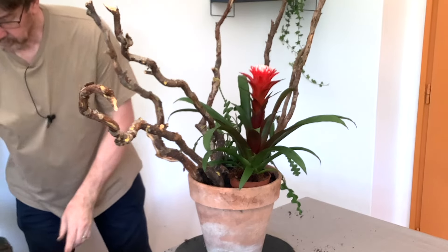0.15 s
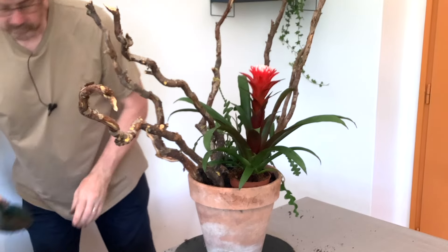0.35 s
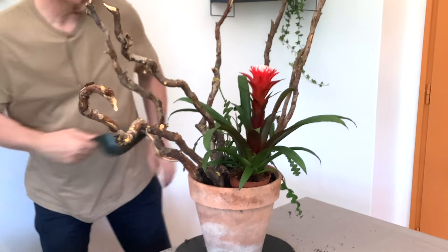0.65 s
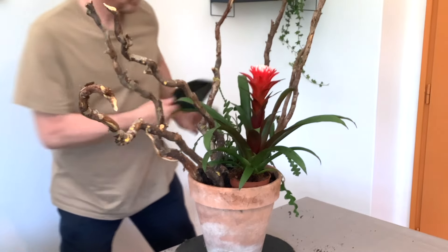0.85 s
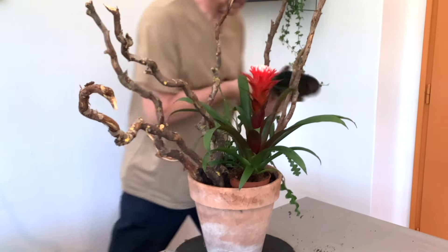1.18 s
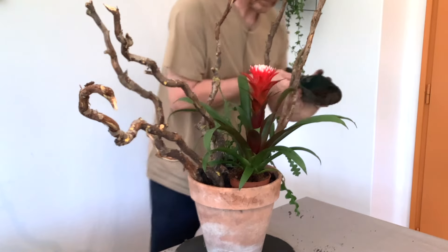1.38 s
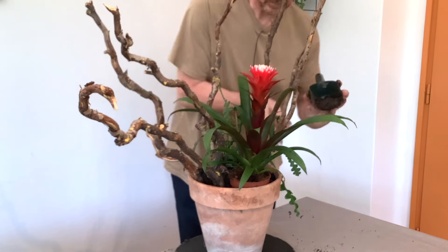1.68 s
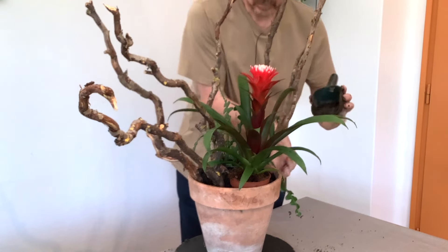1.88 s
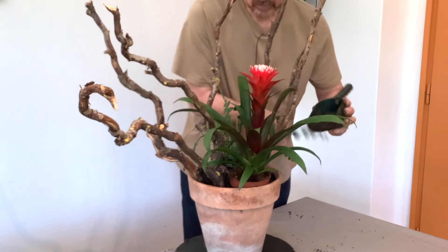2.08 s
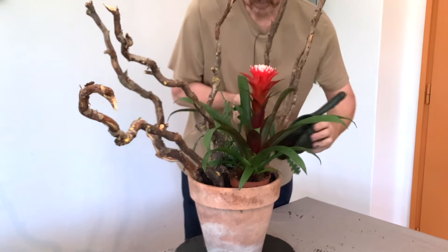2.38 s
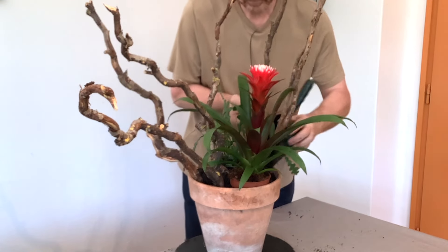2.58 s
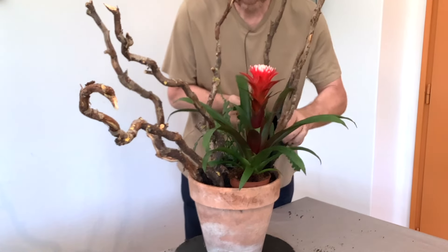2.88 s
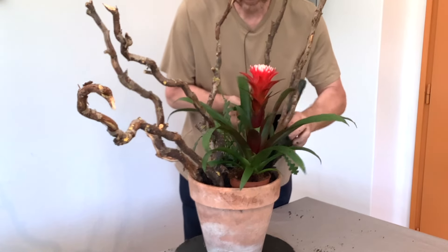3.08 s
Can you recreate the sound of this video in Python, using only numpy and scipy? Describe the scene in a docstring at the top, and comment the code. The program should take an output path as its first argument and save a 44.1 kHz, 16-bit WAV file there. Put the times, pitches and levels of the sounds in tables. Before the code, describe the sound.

A plastic scoop pours compost into a terracotta pot in a small room. It starts with a faint, hollow ring. From about 0.8 to 2 seconds, a shirt rubs and bumps a clip-on microphone while leaves swish and twigs tick over a low rumble. At 2.5 seconds a light tap starts the compost sliding. The scoop knocks at 2.6 and, louder, at 2.8 seconds, and crumbs trickle away.

```python
"""In a small room, a plastic hand scoop leaves the compost with a low, hollow ring.
As it is carried, scoop, sleeve and leaves swish, and the gardener's shirt rubs and bumps a clip-on
microphone over the rumble of its swaying lead. Twigs and leaves tick as he leans in.
With a light tap of the scoop, compost starts to slide into a terracotta pot.
The scoop then knocks twice on the pot and crumbs trickle out."""
import sys
import numpy as np
from scipy import signal
from scipy.fft import rfft, irfft
from scipy.io import wavfile
from scipy.ndimage import uniform_filter1d

SR = 44100
rng = np.random.default_rng(int(sys.argv[2]) if len(sys.argv) > 2 else 0)


def waveform_to_disk(signal):
    """Save audio, clipped to [-1, 1], as 16-bit WAV at the path in sys.argv[1]."""
    frames = np.transpose(np.atleast_2d(signal))
    scaled = np.clip(frames, -1, 1) * 32767
    samples = np.round(scaled).astype(np.int16)
    wavfile.write(sys.argv[1], SR, samples)


N = 143325
T = np.arange(N) / SR
SNAP_DECAY_S = 0.0018  # dry bits, twigs and leaves

# Scoop hits on the pot, with rattles: (time [s], thud level [dB], thud pitch [Hz], clack level [dB])
SCOOP_HITS = [(2.6154, -31.5, 333, -33.5), (2.624, -32, 1260, -38), (2.633, -52, 1190, -44),
              (2.7954, -24, 657, -31.5), (2.8042, -32.5, 1070, -25.5), (2.8181, -56, 750, -33),
              (2.8579, -36, 406, -58)]
# Modes of pot, table and scoop: (pitch [Hz], gain [dB], 60 dB decay time [s])
KNOCK_MODES = [(83.1, -1.5, 0.233), (325, -6, 0.042), (426, -6.5, 0.044), (641, -14, 0.14),
               (781, -11, 0.11), (864, -21, 0.024), (1003.6, -4, 0.11), (1097, -0.5, 0.03),
               (1344, -7, 0.028), (1552, -10, 0.068), (2560, -14, 0.066), (3600, -11, 0.046),
               (4770, -8, 0.047), (5590, -11.5, 0.048)]
# EQ of the jolted grit: (frequency [Hz], relative gain [dB])
GRIT_EQ = [(300, 11.5), (1200, 17.5), (2000, -9), (5200, -8), (7000, -2), (16000, -9.5)]


def scoop_knocks():
    """Each hit pushes the air, rings the pot's low modes and the scoop's high ones, and jolts the grit."""
    out, t = np.zeros(N), T[:SR // 2]
    clack_above_hz, detune, thump_delay_s, grit_decay_s = 2000, .015, .001, 0.0058
    clusters = {hz: noise_band(hz, 0.068 * hz) for hz, _, _ in KNOCK_MODES if hz > clack_above_hz}
    grit = equalise(rng.standard_normal(N), GRIT_EQ)
    for time, thud_db, thud_hz, clack_db in SCOOP_HITS:
        for k, (hz, db, t60) in enumerate(KNOCK_MODES):
            if hz in clusters:  # the scoop's tightly packed modes ring as noise
                ring = amp(clack_db) * np.roll(clusters[hz], -round(time * SR))[:len(t)] / np.sqrt(2)
            else:  # modes near the thud's pitch ring most
                octaves_away = np.log2(hz / thud_hz)
                drive = 0.38 + 0.62 * np.exp(-(octaves_away / 0.69) ** 2)
                detuned_hz = hz * (1 + detune * rng.uniform(-1, 1))
                ring = amp(thud_db) * drive * (-1) ** k * np.sin(2 * np.pi * detuned_hz * t)
            add(out, time, amp(db - 60 * t / t60) * ring)
        thump = -amp(thud_db + 3) * air_push(thud_hz)
        add(out, time + thump_delay_s - len(thump) / 2 / SR, thump)
        crunch = np.roll(grit, rng.integers(N))[:len(t)] * np.exp(-t / grit_decay_s)
        add(out, time, amp(clack_db - 3.5) * crunch)
    return out


# Fader ride of the sliding compost: (time [s], level [dB])
POUR_FADER = [(2.45, -105), (2.52, -55.5), (2.565, -62), (2.635, -52.5), (2.75, -53.5), (2.785, -57.5),
              (2.83, -47.5), (2.93, -50.5), (2.97, -56.5), (3.08, -58.5), (3.25, -85)]
# EQ of the soft crumbs: (frequency [Hz], relative gain [dB])
CRUMB_EQ = [(100, 13), (350, 2.5), (750, 12), (1100, 1.5), (1900, -3), (3000, 0), (5500, -2.5), (7000, -6),
            (16000, -13)]
# EQ of dry crackle, also of the swishes' hiss: (frequency [Hz], relative gain [dB])
CRISP_EQ = [(300, -3.5), (1000, -19), (3300, -6), (4600, -10), (6100, -5.5), (7300, -10.5), (8700, -9),
            (16000, -25)]


def compost_pour():
    """Crumbs slide off the scoop, each size sounding in its own band; dry bits crackle among them."""
    edges_hz = np.geomspace(100, 16000, 8)
    bands = [signal.butter(2, pair, "band", fs=SR, output="sos") for pair in zip(edges_hz, edges_hz[1:])]
    crumbs, crackle = np.zeros(N), np.zeros(N)
    for band in bands:
        crumbs += signal.sosfilt(band, grains(per_s=10000)) * flutter(depth_db=5.0, per_s=170)
    snaps = rng.standard_normal((3, 1000)) * np.exp(-T[:1000] / SNAP_DECAY_S)
    for band, snap in zip(bands[::-1], snaps):  # top three bands only
        crackle += signal.sosfilt(band, signal.fftconvolve(grains(per_s=300), snap)[:N])
    return fader(POUR_FADER) * (equalise(crumbs, CRUMB_EQ) + amp(-11.5) * equalise(crackle, CRISP_EQ))


# Ticks of twigs, leaves and falling crumbs: (time [s], ring peak [dB], pitch [Hz])
TWIG_TICKS = [(.1713, -44, 970), (.172, -38.5, 8100), (0.2188, -45.5, 1010), (0.2366, -42.5, 1040),
              (1.4484, -30.5, 5800), (1.541, -26.5, 3680), (1.677, -41, 2250), (1.833, -39.5, 6100),
              (1.9633, -27.5, 6020), (2.106, -43, 6400), (2.841, -31, 3600), (3.067, -37, 4440),
              (3.122, -47, 5300)]


def twig_ticks():
    """A small dry piece snaps and rings for a few cycles."""
    out, t = np.zeros(N), T[:1000]
    attack_cycles = 0.87
    for time, db, hz in TWIG_TICKS:
        age = t * hz / attack_cycles
        ring = np.sin(2 * np.pi * hz * t) * age * np.exp(1 - age)
        snap = noise_band(hz, hz / 2, size=len(t)) * np.exp(-t / SNAP_DECAY_S)
        add(out, time, amp(db) * (ring + amp(-8) * snap))
    return out


# Dull bumps: the shirt on the microphone, and one light tap of the scoop as the pour starts:
# (time [s], level [dB], pitch [Hz])
DULL_BUMPS = [(0.499, -45.5, 123), (.72, -50, 960), (1.172, -40, 146), (1.254, -32.5, 466),
              (1.367, -39.5, 344), (1.4531, -31, 423), (1.6771, -32, 810), (1.7114, -38.5, 1100),
              (1.8379, -45, 170), (1.888, -40.5, 604), (1.9017, -35, 79), (2.521, -42.5, 1070),
              (3.237, -42, 1290)]


def dull_bumps():
    """Soft blows with no ring, each with a short scuff for a tail."""
    out, t = np.zeros(N), T[:4000]
    scuff_decay_s = 0.005
    for time, db, hz in DULL_BUMPS:
        thump = air_push(hz)
        scuff = noise_band(hz, hz, size=len(t)) * np.exp(-t / scuff_decay_s)
        add(out, time - len(thump) / 2 / SR, amp(db) * thump)
        add(out, time, amp(db - 9.5) * scuff)
    return out


# Fader rides of the rubbing shirt: (time [s], rasp level [dB], low-mid level [dB])
SHIRT_FADERS = [(0, -67, -65.5), (.65, -73, -81), (.8, -65, -60), (1.03, -60, -61), (1.2, -53, -59),
                (1.32, -54.5, -73), (1.39, -47, -59.5), (1.52, -48.5, -64), (1.58, -52, -55.5),
                (1.67, -56.5, -63), (1.77, -62, -60), (1.98, -63.5, -62.5), (2.3, -65.5, -70.5),
                (2.45, -70.5, -68)]
# EQ of the fibres' rasp: (frequency [Hz], relative gain [dB])
RASP_EQ = [(500, -22), (1000, 1.5), (1500, 1), (2400, -1), (3200, -1.5), (4300, -4.5), (6200, -7.5),
           (8500, -10), (16000, -19.5)]
# EQ of the cloth's low mids: (frequency [Hz], relative gain [dB])
LOW_MID_EQ = [(100, -1), (350, 4), (650, -1.5), (1100, -6.5), (1800, -13), (4000, -49)]
# Fader ride of the swaying microphone lead: (time [s], level [dB])
LEAD_FADER = [(0, -69.5), (.32, -57.5), (.45, -62), (.72, -51), (1.4, -53.5), (1.78, -61.5), (1.92, -54),
              (2.05, -68.5), (2.4, -66.5), (2.85, -59), (3.25, -60.5)]
# EQ of the lead's rumble: (frequency [Hz], relative gain [dB])
LEAD_EQ = [(15, 3), (40, 7), (130, -7), (220, -14), (1000, -48)]


def shirt_rub():
    """Cloth fibres catch and slip while the body moves; the swaying lead rumbles underneath."""
    rasp = fader(SHIRT_FADERS, column=1) * equalise(grains(per_s=20000), RASP_EQ)
    low_mids = fader(SHIRT_FADERS, column=2) * equalise(rng.standard_normal(N), LOW_MID_EQ)
    rumble = fader(LEAD_FADER) * equalise(rng.standard_normal(N), LEAD_EQ)
    return rasp * flutter(depth_db=1.3, per_s=60) + low_mids * flutter(depth_db=2.3, per_s=50) + rumble


# Slides of scoop, sleeve and leaves:
# (centre time [s], resonance [Hz], width [Hz], resonance level [dB], hiss level [dB])
SWISHES = [(0.222, 930, 402, -59.5, -58), (0.517, 1350, 610, -59, -67), (.91, 1950, 900, -61.5, -65.5),
           (.98, 1490, 202, -48, -47), (1.062, 2450, 1010, -53, -62), (1.106, 1440, 1600, -53, -54),
           (1.21, 3500, 900, -56.5, -56), (1.306, 930, 446, -50.5, -61.5), (1.39, 1470, 950, -52, -76)]
# Airy top of quickly sliding cloth: (centre time [s], level [dB])
CLOTH_SHEEN = [(.975, -55), (1.12, -55), (1.515, -63)]


def swishes():
    """Each slide swells and fades: a fuzzy resonance under grainy hiss, or an airy sheen."""
    out, swell_s = np.zeros(N), 0.023
    hiss = equalise(grains(per_s=20000), CRISP_EQ)
    for time, hz, width_hz, db, hiss_db in SWISHES:
        swell = np.exp(-.5 * ((T - time) / swell_s) ** 2)
        out += swell * (amp(db) * noise_band(hz, width_hz) + amp(hiss_db) * hiss)
    for time, db in CLOTH_SHEEN:
        swell = np.exp(-.5 * ((T - time) / swell_s) ** 2)
        out += swell * amp(db) * noise_band(hz=11500, width_hz=6000)
    return out


# Fade-out of the hollow ring: (time [s], level [dB])
HOLLOW_FADER = [(0, -51.5), (.1, -63.5), (.16, -63.5), (.24, -72)]


def hollow_ring():
    """A low, wavering ring dies away as the scoop leaves the compost."""
    drift = unit_rms(uniform_filter1d(rng.standard_normal(N), size=900))
    hz = 279 + 11 * drift
    tone = np.sqrt(2) * np.sin(2 * np.pi * np.cumsum(hz) / SR)
    gate = T < HOLLOW_FADER[-1][0]
    return fader(HOLLOW_FADER) * tone * flutter(depth_db=4.5, per_s=150) * gate


# EQ of the room's still air: (frequency [Hz], relative gain [dB])
AIR_EQ = [(30, -3), (126, -3.5), (400, -13), (1000, -19.5), (2300, -31), (7000, -31.5), (15500, -36)]


def room_tone():
    """Still air lays a faint, dark bed of noise."""
    return amp(-65.5) * equalise(rng.standard_normal(N), AIR_EQ)


# Reverb of the small room: (frequency [Hz], 60 dB decay time [s])
ROOM_DECAY = [(80, 0.3), (300, 0.57), (800, 0.7), (3000, 0.2), (7000, 0.28), (15000, 0.19)]


def reverb(x, wet_db):
    """Reflections add a diffuse tail to x, each band dying at its own speed."""
    predelay_s = .005
    reflections = rng.standard_normal(SR) * (rng.random(SR) < .1) * (T[:SR] > predelay_s)
    hz, t, spectrum = signal.stft(reflections, SR, nperseg=256)
    decay = amp(-60 * t / curve_at(ROOM_DECAY, hz)[:, None])
    tail = signal.istft(spectrum * decay, SR, nperseg=256)[1]
    tail *= 1 + 2.3 * np.exp(-T[:len(tail)] / 0.0059)  # lift the early reflections
    return x + amp(wet_db) * signal.fftconvolve(x, tail / np.linalg.norm(tail))[:N]


def air_push(hz):
    """One push and pull of air, centred in 40 ms; a higher pitch makes it tighter."""
    width_cycles = 0.26
    u = np.arange(-.02, .02, 1 / SR) * hz / width_cycles
    return 3 * u / (1 + u ** 2) ** 2


def grains(per_s, spread_db=3):
    """Random tiny clicks of uneven size."""
    size = amp(spread_db * np.minimum(rng.exponential(1, N), 5))
    return size * rng.standard_normal(N) * (rng.random(N) < per_s / SR)


def noise_band(hz, width_hz, size=N):
    """Noise in one steep-sided resonance, at rms 1."""
    offset = (np.fft.rfftfreq(size, 1 / SR) - hz) / width_hz
    return unit_rms(irfft(rfft(rng.standard_normal(size)) / (1 + 2 * offset ** 2), size))


def flutter(depth_db, per_s):
    """A gain that wanders at random."""
    return amp(depth_db * np.interp(T * per_s, np.arange(2000), rng.standard_normal(2000)))


def fader(rows, column=1):
    """Gain over time from one dB column of a fader ride."""
    rows = np.array(rows)
    return amp(np.interp(T, rows[:, 0], rows[:, column]))


def equalise(x, eq):
    """Shapes x with an EQ curve, then scales to rms 1."""
    gain = amp(curve_at(eq, np.fft.rfftfreq(N, 1 / SR)))
    return unit_rms(irfft(rfft(x) * gain, N))


def curve_at(points, hz):
    """Reads a table on a log-frequency axis."""
    points_hz, values = np.transpose(points)
    return np.interp(np.log(hz + 1), np.log(points_hz + 1), values)


def add(mix, time, sound):
    """Drops a sound into the mix at a time in seconds."""
    part = mix[max(round(time * SR), 0):][:len(sound)]
    part += sound[:len(part)]


def amp(db):
    """Decibels to gain."""
    return 10 ** (np.asarray(db) / 20)


def unit_rms(x):
    """Scales to rms 1."""
    return x / np.sqrt(np.mean(x ** 2) + 1e-20)


def scene():
    """Mono mix over room tone: handling, ticks and knocks get reverb; hollow ring and pour stay dry."""
    bed = room_tone()
    handling = reverb(shirt_rub() + swishes() + dull_bumps(), wet_db=-13.5)
    compost = hollow_ring() + compost_pour()
    ticks = reverb(twig_ticks(), wet_db=-9.5)
    knocks = reverb(scoop_knocks(), wet_db=-10)
    return (knocks + compost + ticks + handling + bed)[None]


def record(dry):
    """A steep high cut on the whole mix."""
    cutoff_hz = 15900
    high_cut = signal.firwin(511, cutoff_hz, window=("kaiser", 9), fs=SR)
    return signal.oaconvolve(dry, high_cut[None], "same")


dry = scene()
out = record(dry)
waveform_to_disk(out)
```